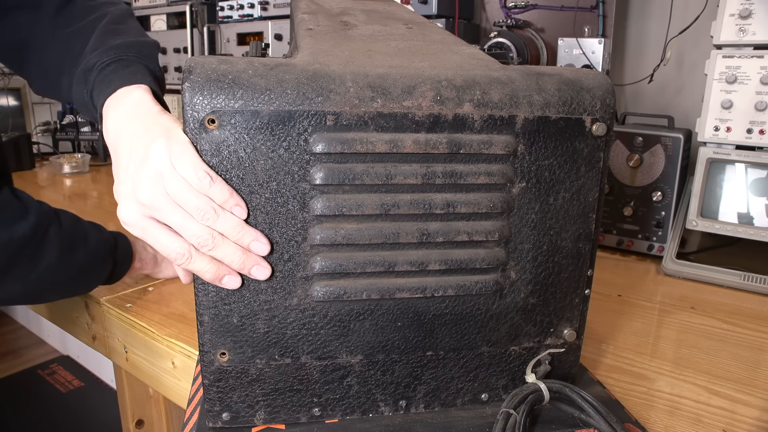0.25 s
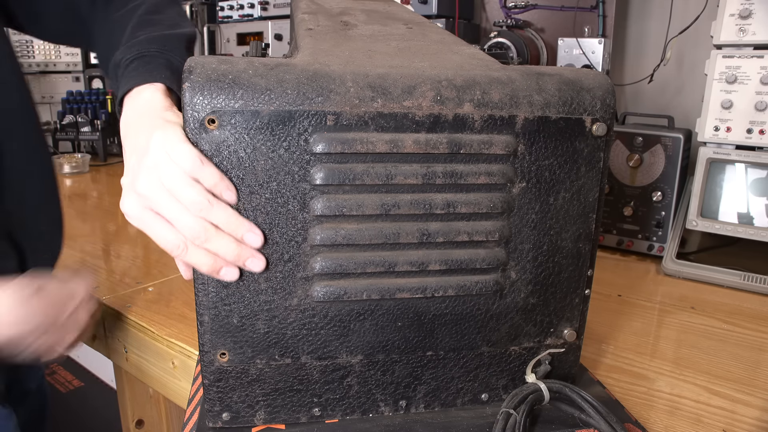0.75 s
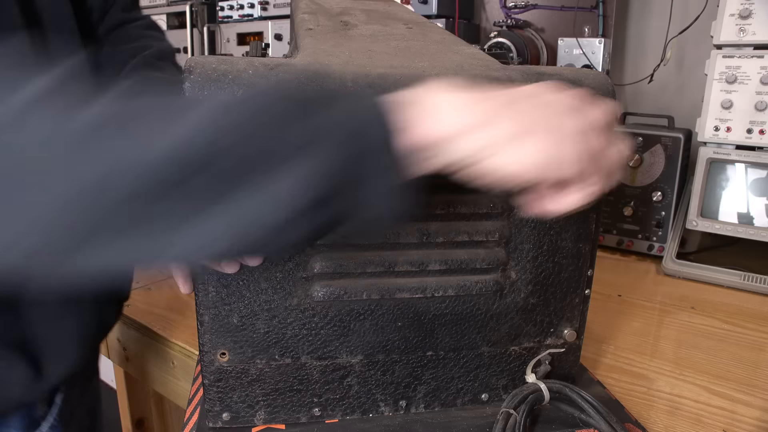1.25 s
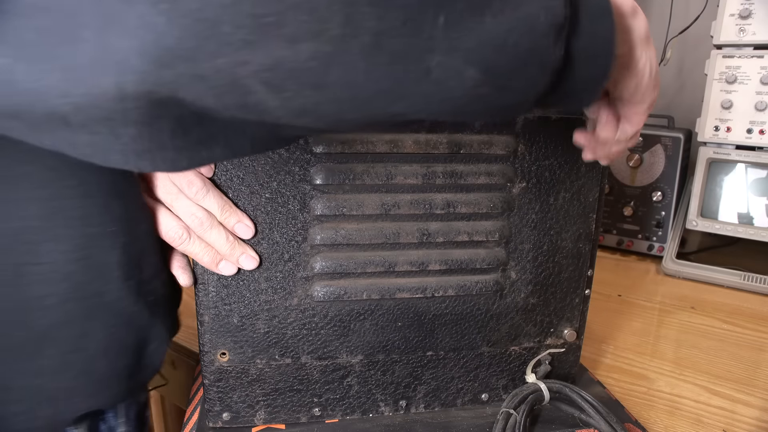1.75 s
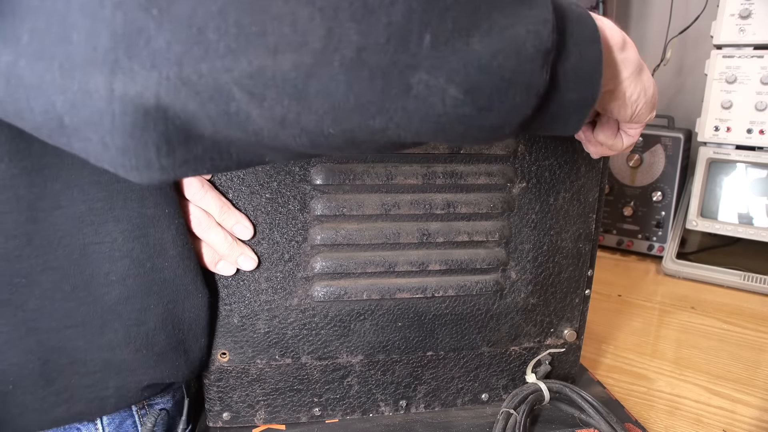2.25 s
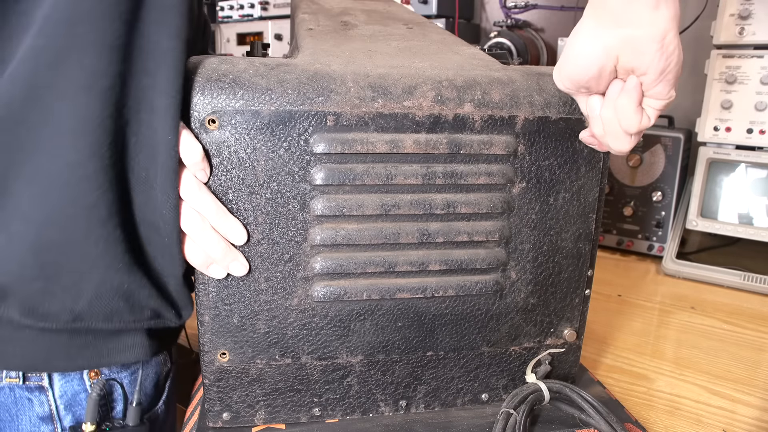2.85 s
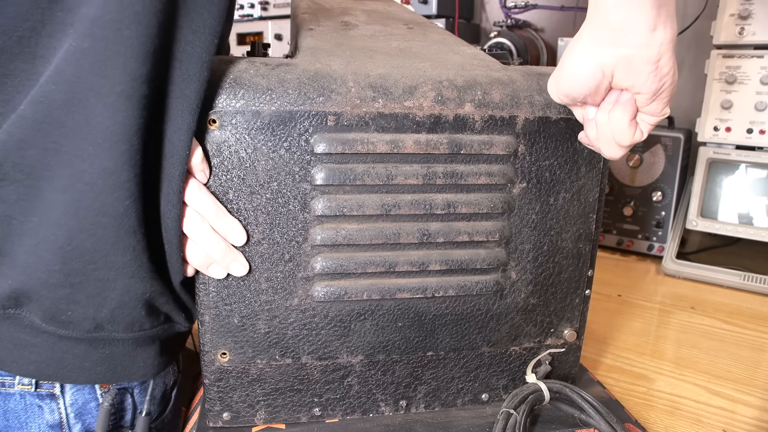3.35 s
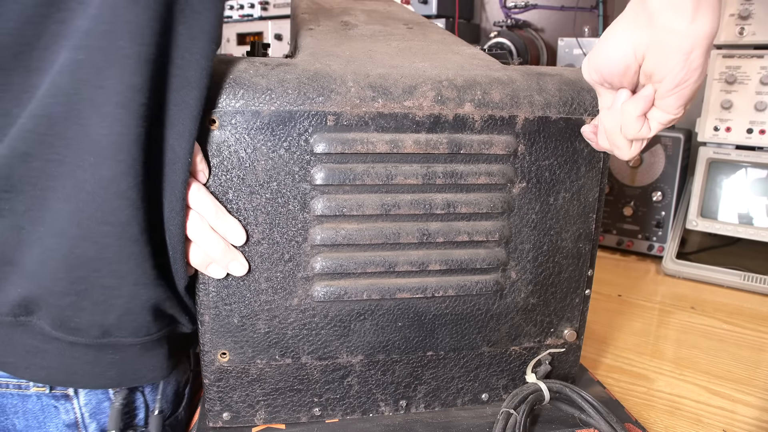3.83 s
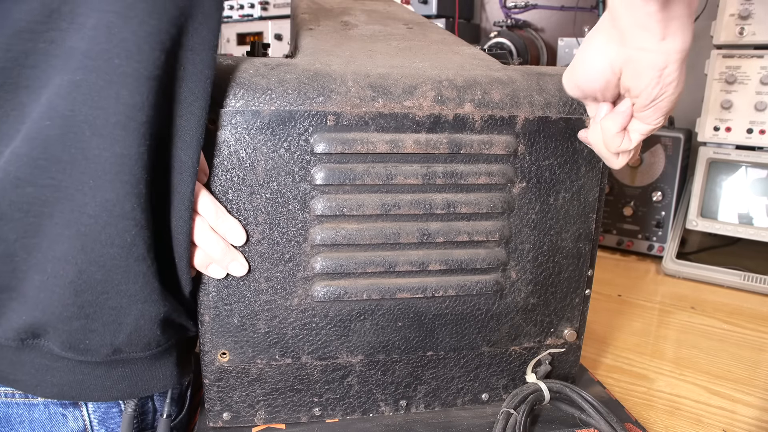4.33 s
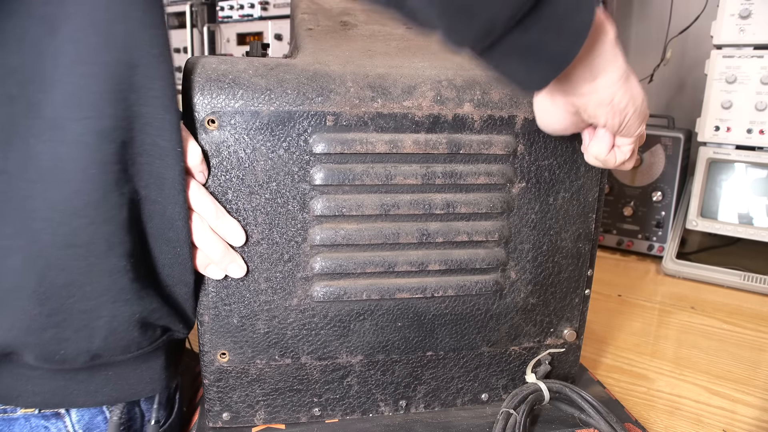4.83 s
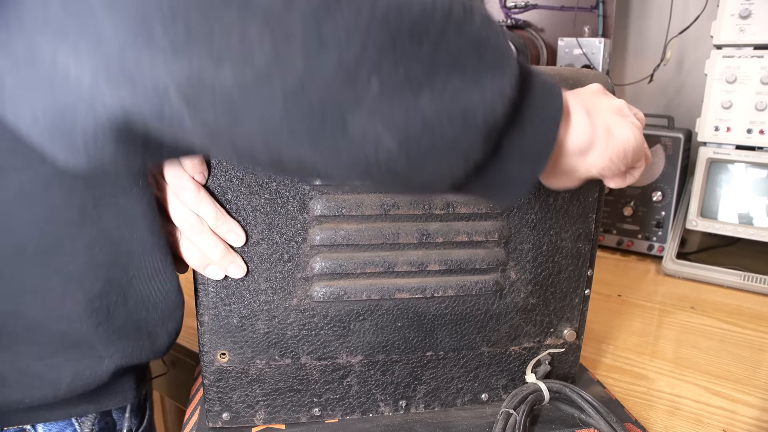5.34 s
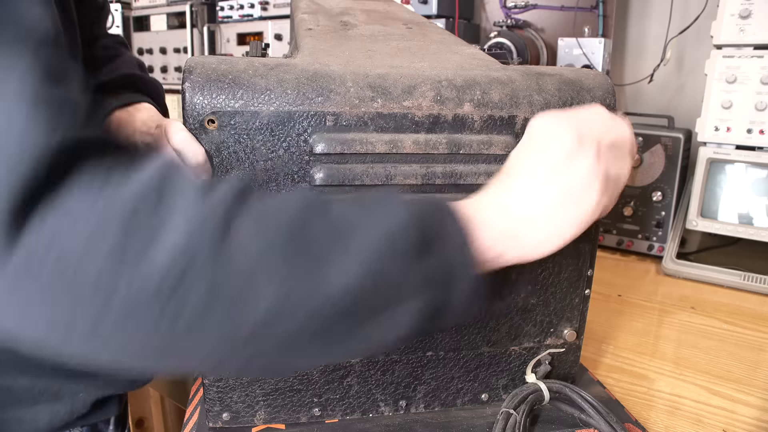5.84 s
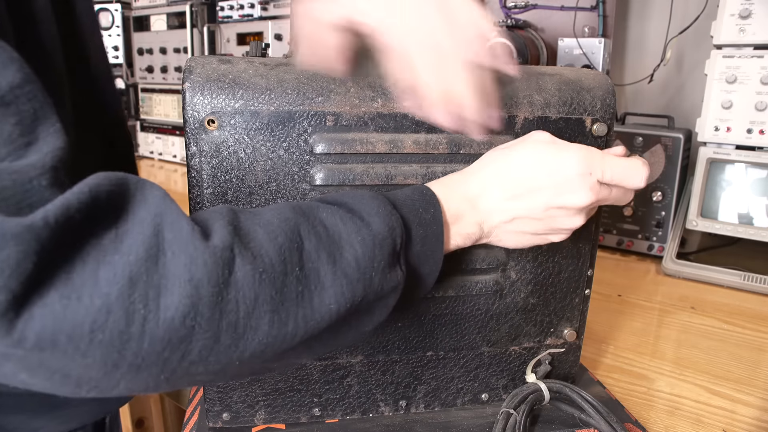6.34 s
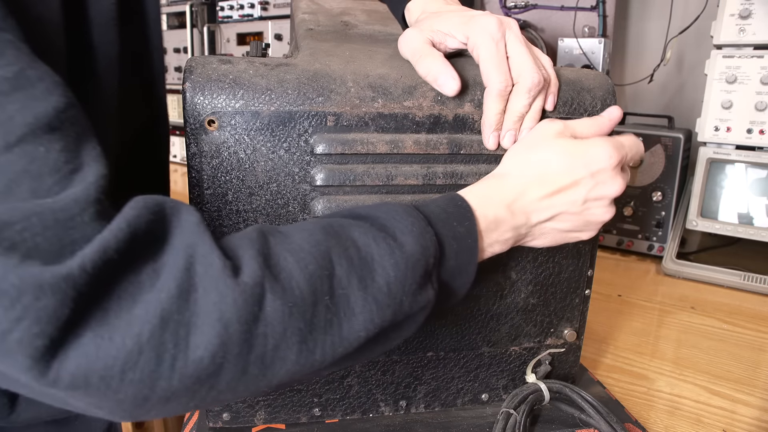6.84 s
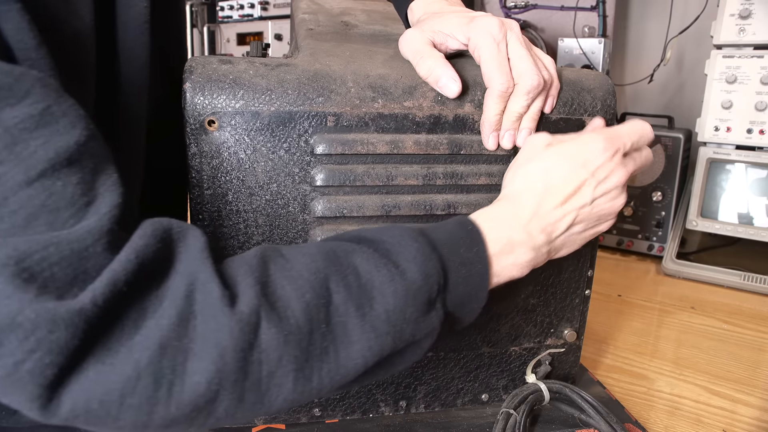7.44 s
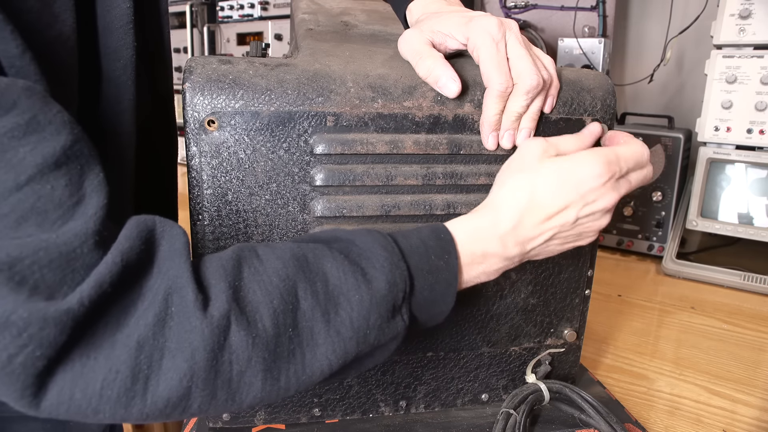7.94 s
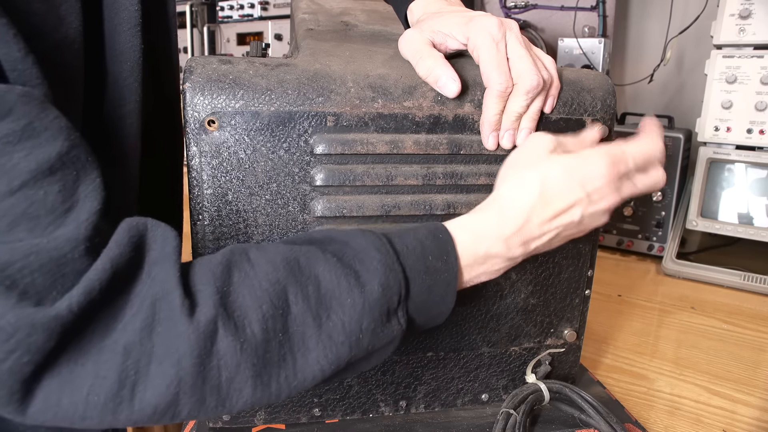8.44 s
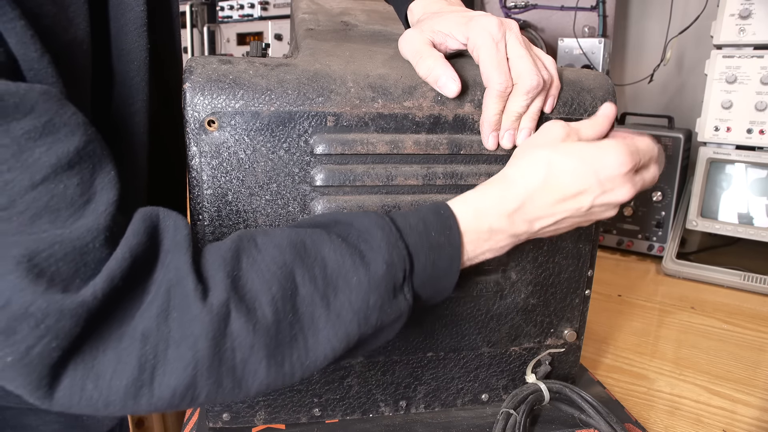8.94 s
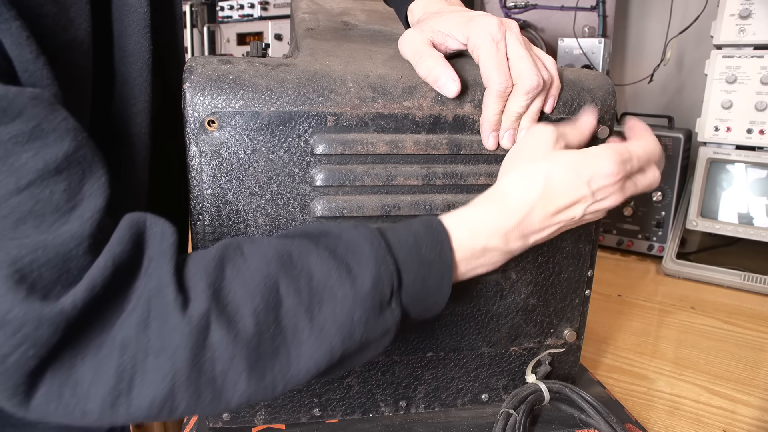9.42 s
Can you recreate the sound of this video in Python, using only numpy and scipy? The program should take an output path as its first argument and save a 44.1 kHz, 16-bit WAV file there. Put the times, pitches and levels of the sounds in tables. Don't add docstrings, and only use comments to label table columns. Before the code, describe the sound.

In a small workshop, a screw hits a wooden bench with one sharp clack. Several quiet seconds follow: skin rubbing rough paint, dry ticks, faint scrapes and dull cabinet bumps. From about six seconds the loosened steel panel knocks its frame, then rattles in bright, irregular bursts until nearly the end. Close microphone, short room tail, low rumble and faint hiss.

```python
import sys
import numpy as np
from scipy import signal
from scipy.fft import rfft, irfft
from scipy.io import wavfile

SR = 44100
rng = np.random.default_rng(int(sys.argv[2]) if len(sys.argv) > 2 else 0)


def how_loud(loudness_db):
    steps = np.asarray(loudness_db, float) / 20
    return 10 ** steps


def inscribe(sig):
    pcm = np.round(np.clip(np.atleast_2d(sig).T, -1, 1) * 32767)
    wavfile.write(sys.argv[1], SR, pcm.astype(np.int16))


N = 426888

# start in seconds, peak in dB, thud in dB re peak,
# edge in dB re peak, centre in Hz.
RAPS = [(0.947, -43.5, 4, -14, 1450), (4.4049, -57, -7, 15, 1360), (6.4777, -38.5, -2, 0, 1200),
        (6.7534, -22.5, -13, -13, 2370), (6.8226, -16, -15, -6, 3300), (7.5494, -48.5, 15, -16, 1460),
        (7.6338, -23.5, -11, 1, 3880), (7.7662, -12.5, -10, -8.5, 3350), (7.7690, -19.5, -8, -2, 3270),
        (7.824, -10, -9.5, -11, 2850), (7.8257, -10, -12, -3, 2600), (8.1645, -18.5, -13.5, -6, 2700),
        (8.1955, -27, -11, 3, 2440), (8.156, -35, -6, -20, 2600), (8.2703, -18.5, -26, -13, 2700),
        (8.3597, -12.5, -18, -2, 1900), (8.7285, -4.5, -18.5, -0.5, 3080), (8.7322, -11, -9, 5.5, 2980),
        (8.9223, -27, -20, -3, 1900), (9.1487, -11, -10.5, -7, 3740), (9.2236, -13.5, -8, -2, 2370),
        (9.259, -17, -33, -15, 2750), (9.4183, -26, -2, 2, 2950), (9.5113, -38, -7, 3, 2500)]
BUMPS = [(1.7945, -21, -6.5, -3.5, 2450), (2.4625, -53, -2, 16, 2230), (3.709, -38, -2, -8, 1460),
         (5.662, -46, -10, 5.5, 1290), (5.9235, -30, -12, 0, 3050), (6.1320, -30, -2.5, -17, 2700),
         (6.2395, -33, -6.5, -20, 2900), (6.538, -38, -13, -7, 3680), (6.783, -27, -14, -20, 2160),
         (7.2557, -42, 1, -15, 2000), (7.6198, -36.5, -15, -7, 2900), (7.9082, -27, -8, -22, 2400),
         (7.9105, -24, -10, 3.5, 3040), (8.1840, -23, -11, -4.5, 3000), (8.3381, -25.5, -7, -14, 2300),
         (8.9328, -19, -17, -7, 4040), (8.9345, -17, -23, 0.5, 3730), (9.5921, -34, -1.5, 2.5, 3000)]
# frequency in Hz, width in Hz, level in dB.
PANEL_MODES = [(629, 10.2, 5.5), (894, 50, 2), (960, 16, 1.5), (1290, 28, 3.5), (1619, 20, 0),
               (1934, 12, 4), (2083, 14, -2.5), (2323, 21, -3), (2500, 130, -14.5), (2820, 40, -1),
               (3180, 21, -6), (3600, 79, -24), (4040, 66, -31), (4880, 450, -7.5), (5650, 38, -34),
               (6000, 69, -15), (8400, 200, -14), (8680, 50, -33), (10200, 130, -29)]
# frequency in Hz, width in Hz, level in dB.
PANEL_RIM = [(6140, 970, 0.5), (8280, 1200, 2.5), (11700, 1500, -1), (14300, 2700, -12)]
# start in seconds, peak in dB, pitch in Hz, T60 in seconds.
RINGS = [(1.7932, -27.5, 750, 0.17), (1.7943, -33, 1160, 0.24), (1.791, -28, 1900, 0.19),
         (1.794, -35, 2320, 0.25), (3.713, -44, 3360, 0.14), (3.71, -46, 5370, 0.12),
         (3.728, -35, 1300, 0.14), (5.9264, -41, 2110, 0.21), (5.928, -29.5, 2650, 0.15),
         (5.9264, -33, 3230, 0.2), (5.9264, -38, 3420, 0.16), (5.926, -37, 4020, 0.22),
         (5.93, -40, 5400, 0.12), (5.924, -39, 11100, 0.08), (6.1318, -37, 688, 0.28),
         (6.1316, -35, 1210, 0.18), (6.8223, -44, 1440, 0.33), (6.8223, -33, 2320, 0.1),
         (6.823, -44.0, 3200, 0.11), (7.768, -23, 2350, 0.13), (7.7664, -43, 2960, 0.11),
         (7.7664, -36, 3860, 0.13), (7.768, -30, 5470, 0.06), (7.7664, -33, 6330, 0.12),
         (7.8246, -36, 632, 0.45), (7.825, -36, 940, 0.5), (7.8253, -25, 1660, 0.08),
         (7.8266, -17, 2510, 0.11), (7.8228, -25, 3240, 0.12), (7.8246, -44, 5050, 0.2),
         (7.8246, -33, 5860, 0.12), (7.9108, -37, 2880, 0.12), (8.1647, -44, 2340, 0.18),
         (8.1647, -41.0, 3200, 0.13), (8.3594, -42, 1290, 0.24), (8.3598, -39.0, 1840, 0.21),
         (8.3594, -40, 7700, 0.12), (8.732, -36, 990, 0.35), (8.7332, -38.0, 1840, 0.3),
         (8.7316, -25, 2340, 0.07), (8.7304, -44, 3270, 0.16), (8.9335, -33, 3235, 0.12),
         (8.9313, -22, 4030, 0.11), (8.9328, -40, 5250, 0.1), (9.1486, -46, 985, 0.33),
         (9.1491, -37, 2910, 0.098), (9.1491, -31, 3350, 0.18), (9.2249, -29, 1640, 0.3),
         (9.223, -32, 2350, 0.18), (9.417, -39.0, 3680, 0.19)]
# time in seconds, pitch in Hz, level in dB.
SQUEAK = [
    (8.668, 4250, -40),
    (8.670, 4250, -25),
    (8.683, 4150, -28),
    (8.697, 4180, -37),
    (8.72, 4300, -46),
]
# multiple of the pitch, level in dB.
SQUEAK_OVERTONES = [(1, -3), (2, -6), (3, -13)]
# frequency in Hz, width in Hz, level in dB.
CABINET_MODES = [(171.4, 17, 2), (249.4, 28.6, 3), (408, 23.4, 0), (587, 9.2, -6), (730, 88, -12.5)]
# frequency in Hz, width in Hz, level in dB.
BENCH_MODES = [(53.7, 23.2, -3), (88, 18.1, 2), (128, 47.3, -4.5)]
# frequency in Hz, density in dB per Hz.
SCRAPE_COLOUR = [(490, -17), (600, -8), (750, -2), (1000, -6), (1600, -9.5), (2500, -12.5), (4500, -23),
                 (8000, -33)]
# frequency in Hz, density in dB per Hz.
SKIN_COLOUR = [(1470, -10.5), (2500, -5), (5190, -5.5), (6010, -4.5), (7530, -5), (11700, -5), (14000, -9),
               (16000, -9)]
# time in seconds, skin noise in dB.
GRIP = [(0, -59), (.5, -58.5), (.9, -57), (1.08, -60), (1.46, -59.5), (1.62, -64.5), (1.9, -55),
        (2.38, -64.5), (2.6, -55.5), (3.2, -59), (3.45, -61), (4.2, -64.5), (5.4, -64), (5.9, -56.5),
        (6.9, -54), (7.1, -61), (8.58, -62.5), (8.9, -55), (9.12, -63), (9.33, -58), (9.55, -56),
        (9.68, -67)]
# start in seconds, hold in seconds, bench thrum in dB, cabinet drag in dB.
SHOVES = [(.64, 0.028, -52, -77), (1.8, 0.0067, -39.5, -32), (1.92, 0.42, -58.5, -67),
          (2.47, 0.032, -43, -44.5), (2.61, .01, -53, -50), (2.76, 0.36, -47.5, -57),
          (3.05, 0.0077, -48, -53.5), (3.3, 0.0092, -60, -52), (3.42, 0.0084, -68, -56.5),
          (3.57, 0.0081, -49.5, -46.5), (3.73, 0.015, -40, -36), (4.23, .01, -50, -58),
          (4.41, 0.019, -49, -45.5), (4.54, 0.006, -52.5, -52.5), (5.59, 0.13, -45.5, -52.5),
          (5.73, 0.0065, -58, -45.5), (5.91, 0.16, -38.5, -60), (6.17, .01, -40.5, -41.5),
          (6.27, 0.0092, -47, -44), (6.52, 0.15, -45, -53), (6.75, 0.037, -39, -50),
          (6.98, 0.018, -47, -72), (7.31, 0.012, -49, -54), (7.54, 0.0065, -42, -50),
          (7.74, 0.17, -46, -70), (8.21, 0.073, -36.5, -41), (8.63, 0.02, -42, -65),
          (8.97, 0.0087, -34, -38.5), (9.26, 0.035, -37, -38.5), (9.42, 0.21, -44.5, -52)]
# start in seconds, hold in seconds, level in dB.
SCRAPES = [(.1, 0.1, -51.5), (.67, 0.078, -53.5), (2.46, 0.14, -53), (2.61, 0.011, -56), (3.2, 0.059, -60),
           (3.73, 0.03, -50), (4.54, 0.016, -58), (5.7, 0.025, -72), (6.17, .01, -46.5), (6.25, 0.025, -44),
           (6.52, 0.34, -50), (7.27, 0.36, -54), (7.47, 0.047, -63), (7.55, 0.012, -47),
           (7.85, 0.012, -39.5), (8.41, 0.0074, -36), (8.61, 0.05, -45.5), (8.76, 0.015, -35.5),
           (8.89, 0.21, -43), (9.19, 0.0057, -36), (9.37, 0.1, -42), (9.62, 0.03, -50)]
# start in seconds, hold in seconds, level in dB.
RUBS = [(.67, 0.13, -57.5), (1.8, 0.07, -50), (2.47, .03, -49.5), (2.52, 0.061, -55), (2.76, 0.032, -53),
        (3.05, 0.014, -53), (3.57, 0.05, -58.5), (3.715, 0.025, -50), (4.23, 0.056, -60.5),
        (4.54, 0.062, -59.5), (5.7, 0.022, -54.5), (5.91, 0.18, -51.5), (6.14, 0.02, -47), (6.27, .01, -70),
        (6.54, 0.053, -46), (6.86, 0.0058, -47.5), (6.96, 0.0039, -52.5), (7.54, 0.0072, -59),
        (7.74, 0.22, -54.5), (8.28, 0.015, -48.5), (8.42, 0.018, -63), (8.61, 0.072, -53.5),
        (8.76, 0.064, -52), (8.85, .03, -53), (9.02, 0.0064, -46.5), (9.25, 0.049, -50), (9.36, 0.035, -53),
        (9.47, 0.017, -54)]
# start in seconds, hold in seconds, level in dB,
# centre in Hz, width in octaves.
SCUFFS = [(1.715, .025, -56, 1950, .5), (2.53, 0.1, -51.5, 7900, 0.49), (2.75, 0.074, -57, 8500, 0.74),
          (3.17, 0.013, -61, 1500, 2.3), (3.225, 0.041, -58.5, 1230, 0.41), (3.39, 0.016, -62, 1500, 1.1),
          (5.93, .025, -47, 5300, 0.43), (5.926, 0.028, -45, 2900, .6), (1.797, 0.028, -38, 1900, 1.3),
          (5.94, 0.03, -45.5, 950, 0.53), (6.555, 0.037, -47, 1380, 1.4), (6.57, .04, -53, 3800, 0.91),
          (7.47, 0.05, -56.5, 3300, 1.6), (7.48, .04, -52, 800, .6), (7.53, 0.041, -55, 1200, 1.4),
          (8.362, 0.027, -43, 1590, 1.1), (8.674, 0.0072, -36, 8900, 1.6), (9.393, 0.023, -39, 1900, 1.2),
          (9.42, 0.016, -36.5, 3200, 0.68), (9.51, 0.015, -46, 10600, 0.95),
          (1.795, 0.033, -35.5, 710, 0.73), (3.715, 0.017, -42.5, 1000, 1.1),
          (8.19, 0.016, -50, 12300, 0.55), (8.6, 0.042, -49.5, 9500, 0.86), (8.735, 0.07, -39, 1510, 0.54),
          (9.228, .025, -37, 2500, 1.9), (7.83, 0.063, -43.5, 1510, 2.1), (7.5, 0.018, -53, 10500, .8),
          (5.924, .03, -48, 11000, .8), (5.597, .012, -54, 1800, 1.1), (1.77, .02, -47, 620, .8)]
# start in seconds, peak in dB,
# pitch in Hz, T60 in seconds.
THUMPS = [(1.72, -45, 410, .3), (1.790, -24.5, 742, 0.27), (1.795, -29, 600, .25), (1.794, -25, 420, 0.17),
          (1.795, -31, 252, 0.38), (2.884, -33.5, 200, 0.26), (3.714, -24.5, 164, 0.19),
          (3.712, -29.5, 408, 0.12), (3.717, -36, 238, 0.6), (4.4, -34.5, 133.4, 0.64),
          (4.405, -22.5, 406, 0.047), (5.885, -15, 88, 0.28), (5.942, -33, 264, 0.34),
          (6.153, -28, 88, 0.48), (8.196, -13.5, 88, 0.27), (8.592, -16.5, 92.8, 0.23),
          (8.944, -20, 94, 0.2), (9.231, -17, 88, 0.39)]
# time in seconds, level in dB.
LOUVRES = [
    (5.4, -81),
    (5.476, -58),
    (5.522, -65),
    (5.598, -47.5),
    (5.73, -56),
    (5.86, -89),
]
# start in seconds, peak in dB, edge in dB re peak,
# pop in Hz, pop in dB re peak.
TICKS = [(0.6436, -30.5, -13, 1970, -21.5), (1.6252, -38, -18, 1760, -28), (2.177, -35, -9, 1920, -14),
         (2.2992, -50, -11, 1140, 6.5), (2.8209, -22, -21, 980, -25), (3.3304, -31.5, -16, 910, -14.5),
         (3.433, -47, 12, 1000, -20), (3.848, -43, -20, 1190, 3), (4.207, -31, 8, 2200, -8),
         (4.2079, -26, 5, 990, -5), (4.2086, -33, 5, 5500, 0), (4.2352, -50, -10, 13200, 21),
         (4.27, -48, 0, 1650, 2), (4.44, -30, -5, 1200, -14), (4.4588, -24, -21, 875, -18),
         (4.5265, -31.5, -4, 810, -16), (4.568, -44, -7, 1180, 4), (4.8558, -40, 12.5, 1250, -26),
         (5.242, -41.5, 11.5, 1004, -10), (5.3258, -42.5, 13, 1170, -14), (5.4256, -45.5, 13, 805, -18),
         (5.5113, -55, 0, 10000, 12), (5.713, -55, 5, 11500, 10), (5.778, -55, 5, 13000, 12),
         (5.8075, -40, -6, 6700, 3), (5.818, -46, 5, 9000, 3), (0.2068, -50, 0, 11000, 18),
         (8.7215, -30, -3, 2800, 0), (8.657, -33, -15, 1500, -5)]
# start in seconds, peak in dB, clatter in dB re peak, clatter T60 in seconds.
DROP = [
    (0.1768, -23, -5, 0.13),
    (0.1929, 0, -16, 0.042),
]
# frequency in Hz, density in dB per Hz.
DROP_COLOUR = [(150, -29), (250, -11), (380, -17), (600, -5.5), (1000, -6), (1700, 0.5), (2700, -4),
               (4400, -11.5), (6500, -22.5), (14000, -44)]
# frequency in Hz, width in Hz, level in dB.
SCREW_MODES = [(3600, 700, 15), (6000, 1500, -3), (9800, 1300, -3), (12300, 700, -3)]
# frequency in Hz, width in Hz, level in dB.
BENCH_TOP_MODES = [(580, 14, 10), (880, 8, 14), (1490, 7, 13), (1690, 9, 14), (2067, 8, 15), (2360, 7, 16),
                   (4215, 9, 15)]
# frequency in Hz, T60 in seconds.
ROOM_T60 = [(150, 0.73), (500, 0.61), (1500, 0.49), (4000, 0.25), (9000, 0.28), (15000, 0.34)]
# frequency in Hz, density in dB per Hz.
FLOOR_COLOUR = [(12, -36), (20, 2.5), (70, 13), (116, -10), (315, -22.5), (404, -14), (519, -19),
                (1820, -21.5), (9930, -21), (15500, -28.5)]


def rms_one(x):
    return x / np.sqrt(np.mean(x ** 2) + 1e-20)


def in_time(rows, outside=None):
    s, *columns = np.transpose(rows)
    return [np.interp(np.arange(N) / SR, s, c, outside, outside) for c in columns]


def at_hz(points, hz):
    points_hz, values = np.transpose(points)
    return np.interp(np.log(hz + 1), np.log(points_hz), values)


def coloured(x, spectrum):
    gain = how_loud(at_hz(spectrum, np.fft.rfftfreq(len(x), 1 / SR)))
    return rms_one(irfft(rfft(x) * gain, len(x)))


def band(x, low_hz, high_hz, order=2):
    edges_hz = np.clip([low_hz, high_hz], 10, .45 * SR)
    return signal.sosfilt(signal.butter(order, edges_hz, "band", fs=SR, output="sos"), x + 1e-18)


def drift(rate_hz):
    r = np.exp(-80 * np.pi * rate_hz / SR)
    slow = signal.lfilter([1], [1, -2 * r, r * r], rng.standard_normal(N // 40 + 2002))
    slow = slow[2000:]
    return np.interp(np.arange(N) / 40, np.arange(len(slow)), rms_one(slow))


def body(x, modes):
    out = 0
    for k, (hz, width_hz, level_db) in enumerate(modes):
        r = np.exp(-np.pi * width_hz / SR)
        poles = [1, -2 * r * np.cos(2 * np.pi * hz / SR), r * r]
        out = out + (-1) ** k * how_loud(level_db) * signal.lfilter([1 - r, 0, r - 1], poles, x + 1e-18)
    return out


def grains(per_s, spread_db):
    sizes = how_loud(spread_db * np.minimum(rng.exponential(1, N), 4)) * rng.choice([-1, 1], N)
    return rms_one(sizes * (rng.random(N) < per_s / SR))


def gestures(rows, rise_db_per_s, fall_db_per_s, resting_db, column=2):
    t = np.arange(0, N + 64, 64)[:, None] / SR
    rows = np.array(rows)
    start_s, hold_s, level_db = rows[:, 0], rows[:, 1], rows[:, column]
    early_s = np.maximum(start_s - t, 0)
    late_s = np.maximum(t - start_s - np.abs(hold_s), 0)
    power = np.sum(how_loud(level_db - rise_db_per_s * early_s - fall_db_per_s * late_s) ** 2, axis=1)
    return 10 * np.log10(np.interp(np.arange(N) / SR, t[:, 0], power) + how_loud(resting_db) ** 2)


def add_at(out, start_s, sound):
    at = round(start_s * SR)
    out[at:at + len(sound)] += sound


def contact(hiss, thud_db, edge_db, centre_hz, rattle_db):
    chatter_db, chatter_t60_s = -17, .018
    t = np.arange(len(hiss)) / SR
    pulse = (t == 0) * 1.
    bands = [(580, 1800, thud_db, .3),
             (centre_hz / 1.66, centre_hz * 1.715, 0.1, .11),
             (5300, 15000, edge_db, .06)]
    out = 0
    for low_hz, high_hz, level_db, t60_s in bands:
        crack = band(pulse, low_hz, high_hz, order=3)
        rattle = rms_one(band(hiss, low_hz, high_hz, order=3))
        rattle *= how_loud(rattle_db - 60 * t / t60_s) + how_loud(chatter_db - 60 * t / chatter_t60_s)
        rattle *= 1 - np.exp(-t * low_hz / 0.43)
        part = how_loud(level_db) * (how_loud(-1.5) * crack / np.abs(crack).max() + rattle)
        if t60_s < .1:
            part = body(part, PANEL_RIM)
        out = out + part
    return out


def knocks():
    rap_rattle_db, bump_rattle_db = -14.5, -7.5
    out = np.zeros(N + SR)
    pulse = (np.arange(SR // 3) == 0) * 1.
    modes = np.array([body(pulse, [mode]) for mode in PANEL_MODES])
    blows = [(*row, rap_rattle_db) for row in RAPS] + [(*row, bump_rattle_db) for row in BUMPS]
    blows.sort()
    noise = rng.standard_normal((len(blows), len(pulse)))
    mixes = how_loud(2.0 * rng.standard_normal((len(blows), len(modes)))) * (-1) ** np.arange(len(modes))
    for (s, peak_db, *colour), hiss, mix in zip(blows, noise, mixes):
        hit = contact(hiss, *colour)
        ringing = signal.fftconvolve(hit, mix @ modes)[:len(hit)]
        add_at(out, s, how_loud(peak_db) * (how_loud(-2.0) * hit + how_loud(4.5) * ringing))
    return out[:N] + how_loud(8) * body(out[:N], CABINET_MODES)


def squeak():
    hz, level_db = in_time(SQUEAK)
    on, = in_time([(SQUEAK[0][0], 1), (SQUEAK[-1][0], 1)], outside=0)
    phase = 2 * np.pi * np.cumsum(hz * (1 + .045 * drift(250))) / SR
    below_peak_db = level_db - level_db.max()
    tone = 0
    for k, db in SQUEAK_OVERTONES:
        tone = tone + how_loud(db + .5 * (k - 1) * below_peak_db) * np.sin(k * phase)
    return np.sqrt(2) * tone * on * how_loud(level_db + 2.0 * drift(200))


def rings():
    rough_share, rise_cycles = 0.55, 2.6
    age, out = np.arange(SR // 3) / SR, np.zeros(N + SR)
    for s, peak_db, hz, t60_s in RINGS:
        rise = 1 - np.exp(-age * hz / rise_cycles)
        uneven = np.interp(age, np.linspace(0, age[-1], 70), rng.standard_normal(70))
        level = how_loud(peak_db - 60 * age / t60_s) * (1 - rough_share + rough_share * uneven)
        add_at(out, s, level * rise * np.sin(2 * np.pi * hz * age))
    return out[:N]


def handling():
    grip_db, = in_time(GRIP)
    bench_db = gestures(SHOVES, 206, 57.6, grip_db + 2)
    drag_db = gestures(SHOVES, 800, 160, grip_db - 7.5, column=3)
    scrape_db = gestures(SCRAPES, 127, 400, grip_db - 3)
    rub_db = gestures(RUBS, 330, 390, grip_db)
    bench = rms_one(body(rng.standard_normal(N), BENCH_MODES)) * how_loud(bench_db + 1.13 * drift(14))
    drag = rms_one(body(grains(900, spread_db=4.5), CABINET_MODES)) * how_loud(drag_db + 0.95 * drift(5.1))
    grit = grains(2500, spread_db=0.0)
    scrape = coloured(grit + how_loud(-18) * body(grit, PANEL_MODES), SCRAPE_COLOUR)
    scrape *= how_loud(scrape_db - 5.5 + 3.8 * drift(14.6))
    rub = coloured(grains(9000, spread_db=2.0), SKIN_COLOUR) * how_loud(rub_db + 1.5 + 1.64 * drift(17))
    return bench + drag + scrape + rub


def scuffs():
    rise_s, t60_s = 0.0029, 0.15
    age, out = np.arange(SR // 2) / SR, np.zeros(N + SR)
    grit = grains(3000, spread_db=3.5)
    for k, (s, hold_s, level_db, hz, octaves) in enumerate(SCUFFS):
        piece = np.roll(grit, k * len(age))[:len(age)]
        half = 2 ** (octaves / 2)
        stroke = rms_one(band(piece, hz / half, hz * half))
        shape = np.minimum(age / rise_s, 1) * how_loud(-60 * np.maximum(age - abs(hold_s), 0) / t60_s)
        add_at(out, s, how_loud(level_db) * shape * stroke)
    return out[:N]


def thumps():
    age, out = np.arange(SR) / SR, np.zeros(N + SR)
    for s, peak_db, hz, t60_s in THUMPS:
        rise = 1 - np.exp(-age * hz / 5.4)
        add_at(out, s, how_loud(peak_db - 60 * age / t60_s) * rise * np.sin(2 * np.pi * hz * age))
    return out[:N]


def louvres():
    level_db, = in_time(LOUVRES, outside=-120)
    slat_modes = [(755, 45, 17.0), (920, 29, -14)]   # Hz, width Hz, dB
    return how_loud(level_db) * rms_one(body(grains(1700, spread_db=-2.5), slat_modes))


def ticks():
    echo_s, echo_db = .00035, -13
    out = np.zeros(N + SR)
    pulse = (np.arange(2000) == 0) * 1.
    flutter = np.r_[1, np.zeros(round(echo_s * SR)), how_loud(echo_db)]
    snap = signal.lfilter([1], flutter, band(pulse, 1600, 8400))
    edge = signal.lfilter([1], flutter, band(pulse, 5050, 15000))
    for s, peak_db, edge_db, pop_hz, pop_db in TICKS:
        pop = body(pulse, [(pop_hz, pop_hz / 7.9, 0)])
        parts = [(0, snap), (edge_db, edge), (pop_db, pop)]
        click = sum(how_loud(db) * part / np.abs(part).max() for db, part in parts)
        add_at(out, s, how_loud(peak_db) * click)
    return out[:N]


def screw_drop():
    buzz_db, buzz_t60_s = -39, 0.8
    t, snaps, clatter = np.arange(N) / SR, np.zeros(N), 0
    wood = coloured(rng.standard_normal(N), DROP_COLOUR)
    for s, peak_db, clatter_db, t60_s in DROP:
        age = np.maximum(t - s, 0)
        snaps[round(s * SR)] = how_loud(peak_db)
        clatter = clatter + (age > 0) * how_loud(peak_db + clatter_db - 60 * age / t60_s) * wood
    snap = body(snaps, SCREW_MODES) + how_loud(8) * band(snaps, 1500, 3000)
    top = body(snaps + clatter, BENCH_TOP_MODES)
    landed_s = np.maximum(t - DROP[-1][0], 0)
    buzz = (landed_s > 0) * how_loud(buzz_db - 60 * landed_s / buzz_t60_s) * rms_one(band(wood, 3400, 7200))
    return snap + top + clatter + buzz, coloured(snaps, DROP_COLOUR)


def workshop(x):
    t = np.arange(SR) / SR
    white = rng.standard_normal(SR)
    tail = 0
    for hz in 125 * 2. ** np.arange(8):
        octave = band(white, hz / np.sqrt(2), hz * np.sqrt(2), order=1)
        tail = tail + octave * how_loud(-60 * t / at_hz(ROOM_T60, hz))
    tail *= np.clip((t - .003) / 0.0049, 0, 1)
    return signal.fftconvolve(x, tail / np.sqrt(np.sum(tail ** 2)))[:N]


def room_floor():
    return how_loud(-55.5 + 0.37 * drift(1.2)) * coloured(rng.standard_normal(N), FLOOR_COLOUR)


def scene():
    blows = knocks() + squeak() + rings()
    clicks = ticks()
    screw, bench_top = screw_drop()
    wet = workshop(how_loud(-12.5) * blows + how_loud(-21) * clicks + how_loud(-46.5) * bench_top)
    floor = room_floor()
    hands = handling() + louvres() + scuffs()
    return (blows + hands + thumps() + clicks + screw + wet + floor)[None]


def low_pass(x):
    return signal.sosfilt(signal.butter(12, 16680, fs=SR, output="sos"), x)


def record(dry):
    cut = signal.sosfilt(signal.ellip(9, .5, 55, 15800, fs=SR, output="sos"), dry)
    return low_pass(cut)


dry = scene()
out = record(dry)
inscribe(out)
```